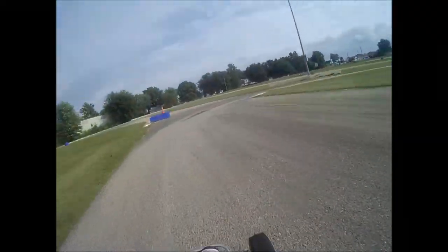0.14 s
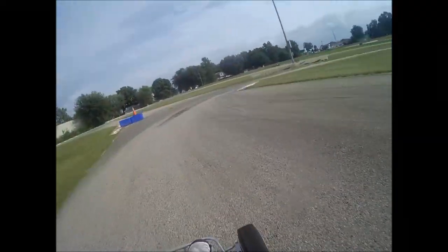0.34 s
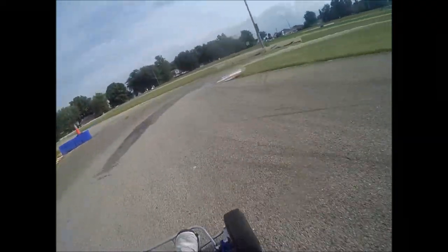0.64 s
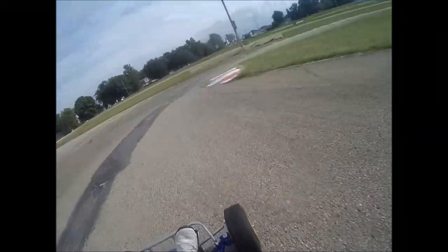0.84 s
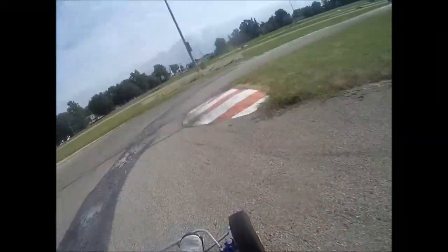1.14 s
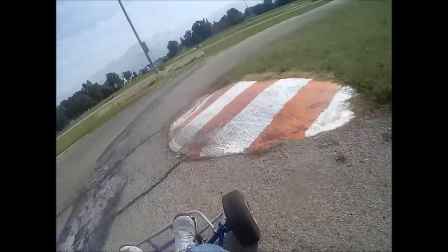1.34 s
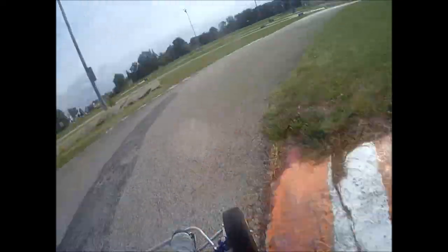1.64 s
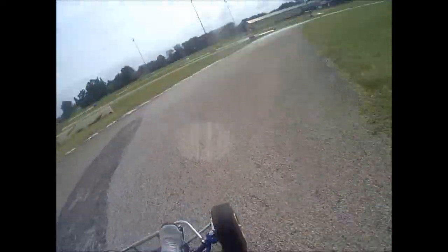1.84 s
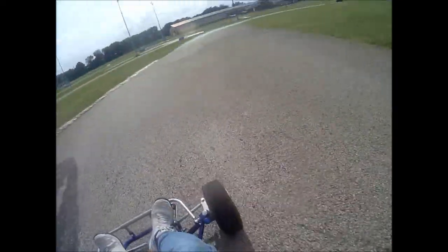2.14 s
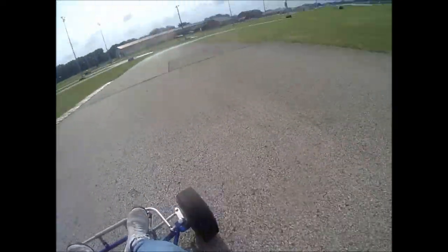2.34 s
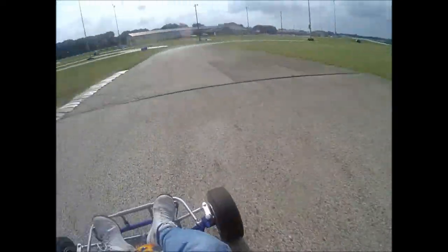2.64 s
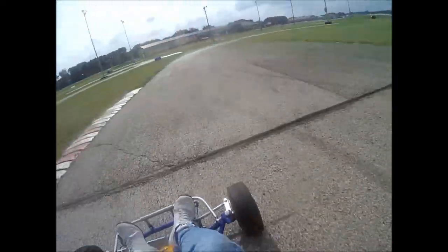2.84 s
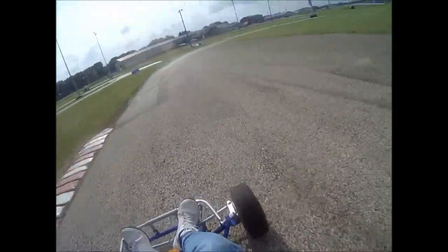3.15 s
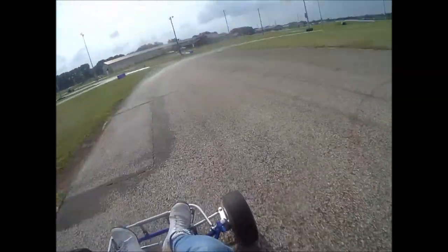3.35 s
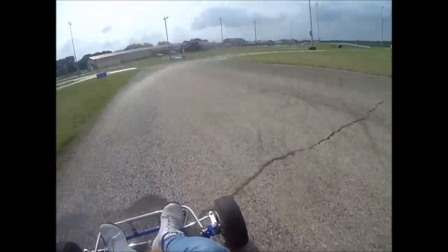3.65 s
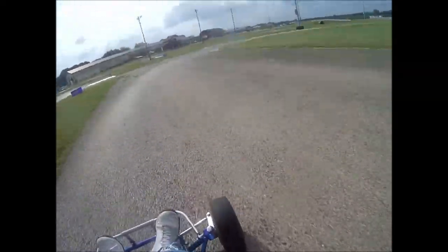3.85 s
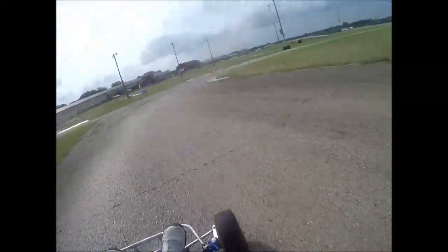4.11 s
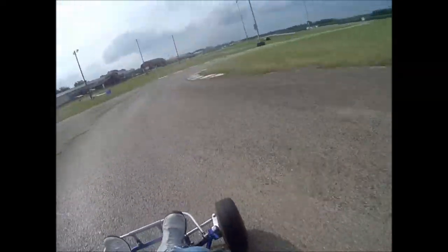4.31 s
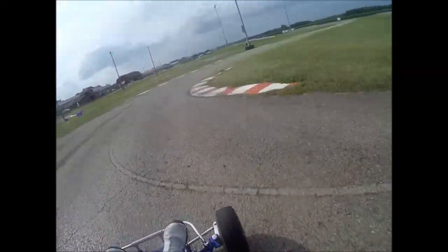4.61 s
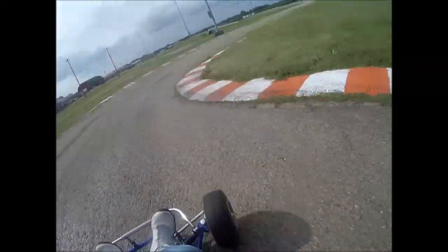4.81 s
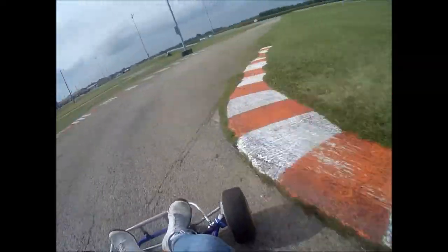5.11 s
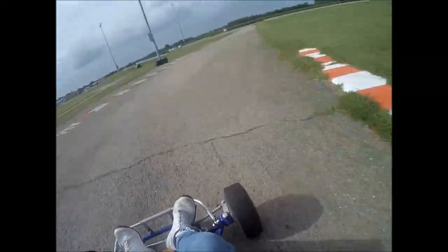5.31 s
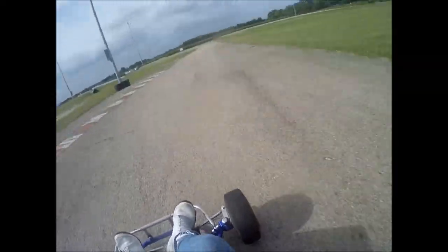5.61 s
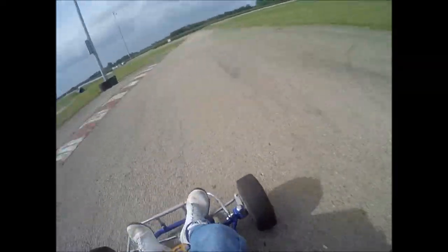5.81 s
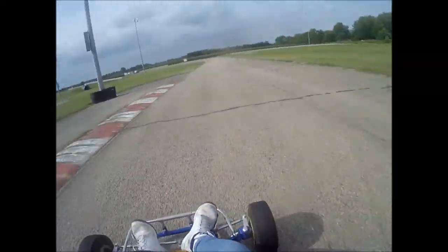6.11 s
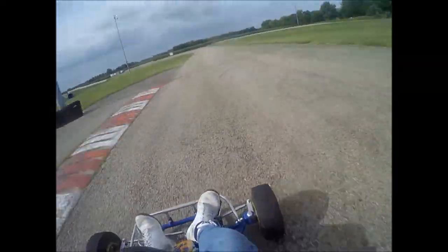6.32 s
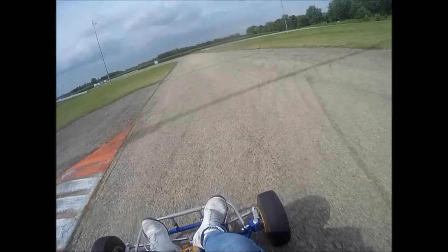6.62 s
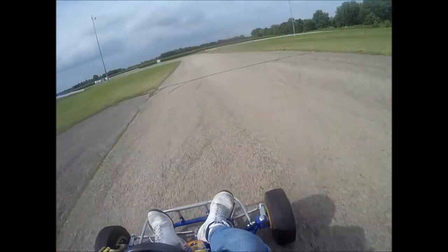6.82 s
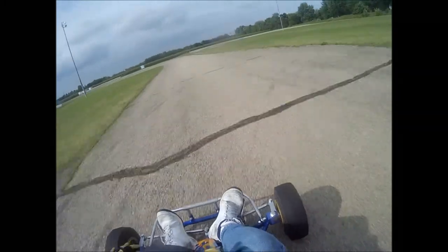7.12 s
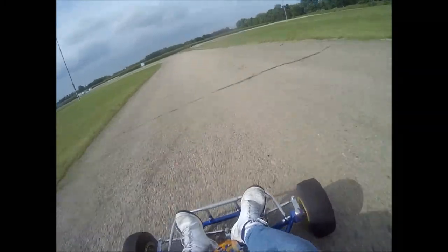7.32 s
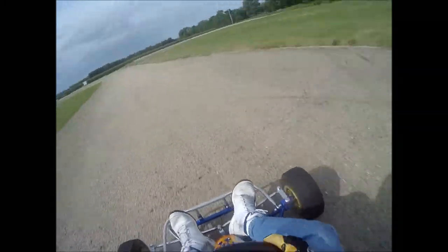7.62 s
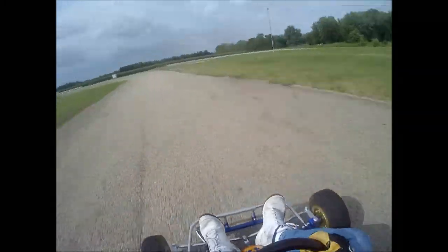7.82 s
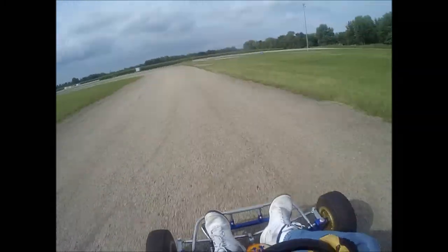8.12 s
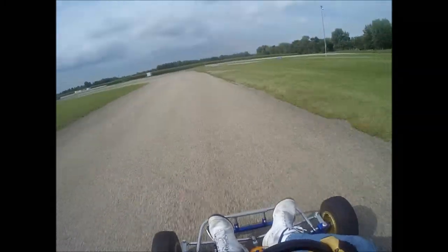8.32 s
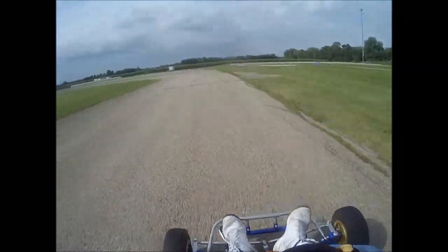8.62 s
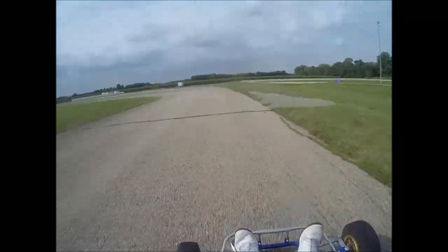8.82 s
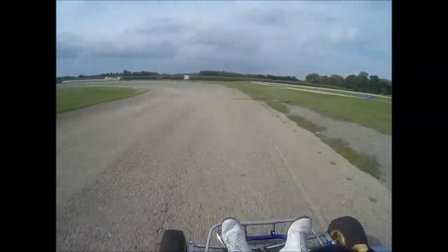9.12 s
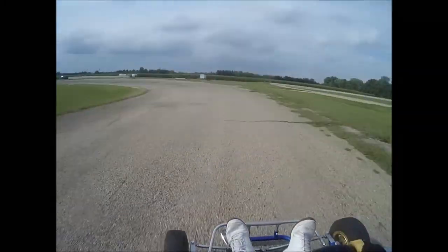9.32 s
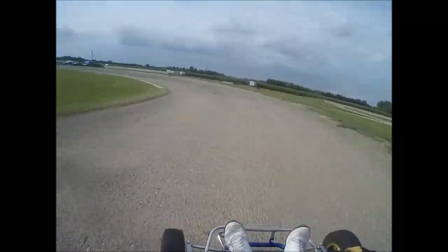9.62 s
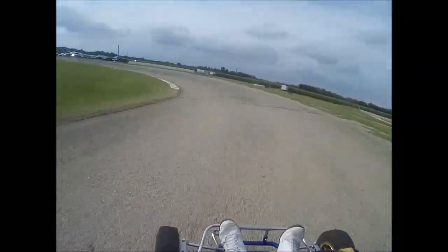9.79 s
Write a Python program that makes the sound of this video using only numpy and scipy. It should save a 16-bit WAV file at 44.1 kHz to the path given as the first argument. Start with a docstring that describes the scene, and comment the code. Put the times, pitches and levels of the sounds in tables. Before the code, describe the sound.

Heard dry and close from a racing kart's seat outdoors. From 0 to 1.4 s two small two-strokes coast, a quieter hollow burble sliding down in pitch over wind and tyre noise, with a few faint pops. At 1.4 s the throttle opens with sharp knocks and both flare into a loud, coarse buzz. Around 1.75 s a tiny stone click and a dull low thump mark the kerb. Until about 6.3 s the pitch holds nearly steady, the two engines beating unevenly, the second stuttering around 4 to 5.2 s. Then they lock together and climb steadily, becoming brighter, harder and raspier, peaking near 8.7 s. The throttle lifts: a cluster of crackling backfires at 8.8 to 8.9 s, level and pitch falling into a thin overrun with scattered pops. At 9.6 s a short, rough burst of throttle returns and fades slightly towards 10 s.

```python
"""On the track, at the driver's seat of a racing kart with two small two-stroke engines close by.
It coasts into a bend and takes the throttle: pulse trains, shaped by pipe resonances, beat on slipping clutches.
They lock to the axle, climb into the range of their tuned pipes, drop at the lift and briefly pull again.
Filtered noise makes wind, tyres and port rasp; sines add harmonics to the coasting, the lift and the last pull.
Knocks of single charges stand out; at the kerb low sines thump the frame and a short ring is a stone strike."""
import sys
import numpy as np
from scipy import signal
from scipy.fft import irfft
from scipy.io import wavfile
from scipy.ndimage import uniform_filter1d

SR = 44100
rng = np.random.default_rng(int(sys.argv[2]) if len(sys.argv) > 2 else 0)


def put_to_file(sound):
    """Save the sound as 16-bit audio at rate SR, in the file named by the first command-line argument."""
    columns = np.atleast_2d(sound).T  # one column per channel
    safe = np.clip(columns, -1, 1)
    whole_steps = np.round(safe * 32767)
    wavfile.write(sys.argv[1], SR, whole_steps.astype(np.int16))


N = 438794
T = np.arange(N) / SR
HZ = np.fft.rfftfreq(4096, 1 / SR)

# Wind and tyres, colour: pitch_hz, level_db
ROAD_COLOUR = [(20, -7.5), (60, -12.5), (110, -8.5), (280, -13.5), (700, -10.5), (920, -9.5), (1300, -4),
               (1900, -1), (2450, -8.5), (2800, -9.5), (3100, -13.5), (3400, -10), (4000, -28.5),
               (4700, -17), (6500, -41), (9000, -42), (15000, -58.5)]
ROAD_DB, ROAD_DB_PER_OCTAVE = -37.5, 3.5  # level at BITE_HZ; growth with the speed of the kart
# The frame drops off the kerb: start_s, level_db, pitch_hz, length_s
THUMPS = [(1.751, -33, 70, .009), (1.773, -38, 50, .022), (1.95, -44, 35, .03)]
# A stone strikes the frame: start_s, level_db (peak, before the trim in kerb)
STONE_HITS = [(1.749, 1)]
# Its ring: pitch_hz, level_db (relative), t60_s
STONE_RING = [(2210, 4, 0.0042), (2753, 8, 0.0045), (4054, 0, 0.01), (5564, 0.5, 0.0048),
              (6200, -8, 0.0054), (8500, -24, 0.0052)]
# Lone firings and backfires: start_s, level_db (peak)
POPS = [(0.0855, -27), (0.2605, -24), (0.3545, -28.5), (0.5995, -17.5), (1.4, -17.5), (1.424, -14.5),
        (1.782, -11.5), (4.533, -20), (8.793, -16), (8.812, -11), (8.845, -11.5), (8.88, -14),
        (9.09, -19.5), (9.331, -22), (9.589, -16), (9.623, -19), (9.837, -14)]
# Their colour: pitch_hz, level_db
POP_COLOUR = [(40, -49), (150, -21), (300, -15.5), (500, 0), (680, 1.5), (930, -17), (1280, 0), (1480, 2.5),
              (1620, 2), (1950, 6.5), (2350, -8), (2800, -6), (4000, -38.5), (8000, -55)]

# Load on the engines: time_s, load (0 throttle shut - 1 flat out)
LOAD = [(1.385, 0.01), (1.41, 0.61), (1.455, 0.86), (1.72, 0.88), (2.3, 0.9), (2.52, 0.96), (2.75, 0.86),
        (3.85, 0.87), (4.55, 0.73), (5.1, 0.86), (5.22, 0.86), (6.3, 0.87), (7.05, 0.82), (7.48, 0.83),
        (7.75, 0.89), (8.45, 0.85), (8.705, 0.86), (8.74, 0.75), (8.82, 0.46), (8.93, 0.33), (8.97, 0.24),
        (9.1, 0.08), (9.54, 0.14), (9.61, 0.79), (9.78, 0.63), (9.87, 0.48), (9.95, 0.5)]
# Firing rate of the first engine once the clutch bites, up the climb and after the lift: time_s, rate_hz
FIRST_SPEED = [(1.55, 117), (1.69, 118.2), (1.92, 118), (2.07, 120.7), (2.3, 120.5), (2.6, 118.7),
               (2.8, 120.5), (3.75, 120.2), (4.68, 116.8), (5.12, 116.7), (5.24, 119.6), (5.9, 119),
               (6.25, 119), (6.45, 123.5), (6.98, 132.8), (7.46, 139.2), (7.85, 144.1), (8.16, 149.3),
               (8.7, 158), (8.82, 155.7), (8.92, 152), (9.2, 146.4), (9.45, 141.4), (9.78, 139.4),
               (9.94, 135.6)]
# Firing rate of the second engine while its clutch slips: time_s, rate_hz
SECOND_SLIP_SPEED = [(1.548, 102.9), (1.979, 104.2), (2.119, 107.7), (2.618, 107.7), (3.028, 109),
                     (3.86, 108.7), (4.02, 113.4), (4.579, 108.1), (4.75, 111.5), (5.169, 108.1),
                     (5.35, 111.6), (5.68, 113.9), (6.1, 116.1), (6.3, 120.3)]
# Pick-up and bumps load or unload the tyres, so speed swerves and exhaust surges:
# centre_s, half_length_s, first_swerve_hz, second_swerve_hz, surge_db
JOLTS = [(1.44, 0.029, 0, 0, 2.5), (1.822, 0.04696, 1.5, 4, -2.5), (2.506, .065, -2.5, 1, -1),
         (5.792, .028, 6.5, 6, 0), (7.639, 0.037, 2.5, 2.1, 2), (9.615, 0.054, 3, 3.2, -0.5)]
COAST_HZ, RUN_DOWN_OCTAVES_PER_S = (111.7, 114.4), .378  # firing rates at the start; both sink at one pace
OPEN_S, FLARE_S = 1.41, .135  # the throttle opens; the engines flare up until the clutches bite
LOCK_S, LOCK_LAG = 6.3, 0.175  # from then on the second fires this share of a turn after the first
BITE_HZ = 120  # firing rate to which the level laws refer
PIPE_FROM_HZ, PIPE_SPREAD_HZ = 127, 6.3  # the tuned pipes come in over this range of firing rates

# Unevenness of the burns, 0-1 (first engine, second engine)
UNEVEN_SLIPPING, UNEVEN_LOCKED, UNEVEN_COASTING = (.035, .18), (.012, .2), (.03, .08)
LIGHT_LOAD_UNEVEN = 0.24  # added as the load falls, once the throttle has opened
# The first engine coughs as the throttle moves: centre_s, half_length_s, added_unevenness (0-1)
COUGHS = [(1.474, .06, .25), (2.493, .03, .1), (4.056, 0.1, 0.09), (4.4, .25, 0), (9.595, 0.036, 0)]
# The second engine four-strokes: start_s, end_s, added_unevenness (0-1), strong_weak_alternation (0-1)
STUMBLES = [(1.356, 1.96, 0.15, 0.2), (3.99, 5.195, 0.02, 0.73), (5.301, 6.1, 0.05, 0.05),
            (7.039, 8.148, 0.02, 0.49), (9.545, 9.903, 0.3, 0.5)]
STUMBLE_FADE_S, STUMBLE_SKIP = 0.042, .15  # skip: chance that a firing breaks the strong-weak pattern

# Resonances crossed by the harmonics when coasting, after the lift and in the last brief pull:
# pitch_hz, width_hz, level_db, even_against_odd_db, start_s, end_s
HARMONIC_RESONANCES = [(550, 50, -43, -14, 0, 1.4), (675, 140, -41, -18, 0, 1.4),
                       (825, 50, -46, 0, .75, 1.4), (1050, 60, -52, 0, .8, 1.4),
                       (1280, 100, -44, 0, 0, 1.4), (1790, 230, -40.5, 0, 0, 1.2),
                       (2850, 120, -52, 0, 0, 1.4), (3400, 150, -55, 0, 0, .8),
                       (725, 60, -41, 0, 8.95, 9.55), (1060, 100, -41, 0, 8.85, 9.25),
                       (1235, 70, -30, 0, 8.77, 8.98), (2170, 100, -25, 0, 8.78, 8.94),
                       (2190, 90, -25, 0, 9.82, 10), (555, 60, -33, 0, 9.58, 10)]
RESONANCE_FADE_S = .06

# State of the exhaust, fractions blend neighbours: time_s,
# state (0 idling down, 1 clutch slipping, 2 pulling, 3 on the pipe, 4 peak revs, 5 overrun)
STATE = [(0, 0.25), (1.38, 0.28), (1.43, 0.91), (6.1, 1.05), (6.45, 2.11), (7.4, 2.21), (7.75, 2.95),
         (7.95, 2.86), (8.35, 3.95), (8.7, 4.32), (8.9, 5), (9.52, 5), (9.62, 4.14), (9.78, 4.5),
         (9.87, 4.6)]
# Colour of one firing of the first engine, a table for each state: pitch_hz, level_db
IDLING = [(100, -12), (280, -11), (450, -2.5), (660, -9.5), (800, 0), (930, -21.5), (1050, -7),
          (1400, -17.5), (1800, 3), (2100, -2.5), (2500, -19), (2850, -6.5), (3100, -22.5), (3400, -8.5),
          (4500, -23), (8000, -58)]  # the second engine shares this one
SLIPPING = [(120, 1.5), (240, -4), (360, -1), (520, 5.5), (830, 9.5), (960, 7), (1080, 7), (1440, -11),
            (1820, 8), (2200, 10.5), (2500, -8), (3200, -12), (4400, -27.5), (8000, -45.5)]
PULLING = [(130, -1), (260, -13.5), (400, 7), (530, 8), (920, 5.5), (1020, -6.5), (1250, -3), (1600, -14),
           (1800, -2.5), (2400, -13.5), (3000, -30), (3450, -16), (4300, -39.5), (8000, -59.5)]
ON_PIPE = [(150, -8.5), (300, -27.5), (440, -5.5), (590, 5.5), (740, 0), (870, -3.5), (1000, -12),
           (1300, -20.5), (1600, -11), (1750, -3.5), (2030, 9.5), (2250, -7), (2450, 3.5), (2680, -28),
           (2950, -5.5), (3200, -11.5), (3450, -23.5), (3900, -21), (4300, -33), (5400, -35.5),
           (8000, -51.5)]
PEAK_REVS = [(150, -4), (300, -26), (460, -0.5), (620, 10), (770, 5.5), (930, -6.5), (1080, 1.5),
             (1240, -3.5), (1400, -4), (1600, -14), (1850, 6), (2150, 9.5), (2330, -3), (2500, -2.5),
             (2700, -12.5), (3100, -8.5), (3550, -14.5), (3700, -29), (3870, -17.5), (4300, -31),
             (5400, -33.5), (8000, -63)]
OVERRUN = [(145, -1), (290, -8.5), (430, 11.5), (590, -2.5), (730, 10), (1000, 5.5), (1350, -6),
           (1650, -11.5), (2050, 9), (2500, -4.5), (3000, -22), (3900, -21), (4500, -29), (8000, -72.5)]
# Colour of the second engine, slipping and then locked to the axle: pitch_hz, level_db
SECOND_SLIPPING = [(110, -4), (220, -6.5), (400, -4), (550, 4.5), (870, -10.5), (1100, -8), (1320, 2),
                   (1520, 4), (1720, -28), (1900, -2.5), (2200, 1), (2500, -15), (3100, -23), (7000, -48)]
SECOND_LOCKED = [(130, -7.5), (260, -8), (400, 3.5), (620, 2), (900, -5.5), (1100, -1.5), (1300, -1),
                 (1600, -12.5), (1950, -3), (2400, -7.5), (2800, -17), (3400, -28), (4400, -37),
                 (8000, -53)]
# Resonances and dips of pipes and silencers: pitch_hz, width_hz, lift_db
PIPE = [(636, 18, 7), (933, 29, -8.5), (1306, 98, 11.5), (1602.5, 243, 13), (2140, 77, -1),
        (2710, 416, 16.5), (3416, 564, 9.5), (4745, 320, 14.5), (5560, 970, 14.5)]
HOT_PIPE = 1.016  # at peak revs hotter gas raises the pipe resonances by this factor
# Turbulent share of a firing: pitch_hz, level_db
TURBULENCE = [(100, -27.5), (500, 1), (950, 9.5), (1350, 5.5), (2000, 13.5), (3000, 9), (5000, 11)]
# Reflections of the bark off seat, bodywork and track: delay_s, level_db
ECHOES = [(.0043, -16.5), (0.0108, -15.5)]
SILENCER_REFLECTION = .45
PIPE_TRIP_S = 0.000367  # on the pipe only one short round trip blunts the crack
# Rings of the exhaust that sing out around one load: pitch_hz, width_hz, level_db, load (0-1)
LOAD_RINGS = [(1010, 82, 9.5, 0.97), (1880, 260, 2, 0.94), (2826, 280, -0.5, 0.92), (3360, 230, -17, 0.4)]
RING_LOAD_SPREAD = 0.057
# Gas hissing out of the ports: pitch_hz, level_db
RASP_COLOUR = [(1500, -21), (3000, 6.5), (4000, 9.5), (4700, -9.5), (5600, -9.5), (6800, 0), (8500, -12.5),
               (11000, -49.5), (14300, -6.5), (15200, -18)]
# This hiss swells or sinks: centre_s, half_length_s, level_db
RASP_SWELLS = [(2.298, 0.23, 1.5), (7.716, .15, 4), (8.5, 0.49, -0.5)]

# Loudness of drone, bark and rasp before the trims in engines: full_load_db (at BITE_HZ),
# lost_with_throttle_shut_db, per_octave_of_speed_db, gained_when_locked_db, gained_on_pipe_db
DRONE_LAW = (-28.5, 15.5, 7.5, 7.5, -1)
BARK_LAW = (-18.5, 22, 17, -3, 2.5)
RASP_LAW = (-37.5, 10.5, 11, 9, -9.5)
# Level of the second engine against the first: time_s, level_db
SECOND_LEVEL = [(1.35, -7), (1.5, -4.5), (2.4, -4.5), (4.1, -4.5), (5.1, -9.5), (5.3, -1), (6.2, -3),
                (6.5, -20.5), (7.05, -6), (7.9, -12.5), (8.6, -17.5), (9.1, -20.5), (9.5, -16.5)]
DRONE_HANG_S = 0.05  # the drone outlasts the bark when the throttle is lifted
BARK_SURGE = 0.94  # share of a surge that reaches the bark
SPUTTER_DB, SPUTTER_S = 1.5, 0.015  # random flutter of the bark, deepest with the throttle shut
EDGE_HZ = 15300  # upper limit of the microphone signal


def amp(db):
    """Amplitude factor of a level in dB."""
    return 10 ** (np.asarray(db) / 20)


def evened(x):
    """Scales to rms 1."""
    return x / np.sqrt(np.mean(x ** 2) + 1e-20)


def ramp(x):
    """Holds x between 0 and 1."""
    return np.clip(x, 0, 1)


def swell(s, half_s):
    """A smooth bump of height 1 around time s."""
    return np.exp(-((T - s) / half_s) ** 2)


def curves(rows, t=T):
    """The columns of a table at times t."""
    s, *columns = np.transpose(rows)
    return [np.interp(t, s, column) for column in columns]


def spectrum(points):
    """Gain over frequency from pitch_hz, level_db points."""
    hz, db = np.transpose(points)
    return amp(np.interp(np.log(HZ + 1), np.log(hz), db))


def causal(gain):
    """The minimum-phase response with this gain: it rings only after the blow."""
    both_sides = np.r_[gain, gain[-2:0:-1]]
    log_gain = np.log(np.maximum(both_sides, 1e-5))
    return np.exp(np.conj(signal.hilbert(log_gain)))[:len(gain)]


def delayed(s):
    """Response of a pure delay."""
    return np.exp(-2j * np.pi * HZ * s)


def filtered(x, response):
    """Passes a sound through a frequency response."""
    return signal.oaconvolve(x, irfft(response))[:N]


def add(mix, s, sound):
    """Lays a sound into the mix at time s."""
    part = mix[round(s * SR):][:len(sound)]
    part += sound[:len(part)]


def speeds():
    """Firing rates of both engines: running down, flaring up to the slipping clutches, then locked."""
    flare, rates = ramp((T - OPEN_S) / FLARE_S), []
    for k, driven in enumerate((FIRST_SPEED, SECOND_SLIP_SPEED)):
        coast_hz = COAST_HZ[k] * 2 ** (-RUN_DOWN_OCTAVES_PER_S * T)
        swerve_hz = sum(hz[k] * swell(s, half_s) for s, half_s, *hz, _ in JOLTS)
        rates.append(coast_hz + flare * (curves(driven)[0] - coast_hz) + swerve_hz)
    first_hz, second_hz = rates
    return first_hz, np.where(T < LOCK_S, second_hz, first_hz)


def road(flutter_db=1.5):
    """Wind and tyre noise follows the axle, which catches up during the slip; it flutters as the kart shakes."""
    gripping = (T < OPEN_S) | (T > LOCK_S)
    axle_hz = np.interp(T, T[gripping], speeds()[0][gripping])
    flutter = evened(uniform_filter1d(rng.standard_normal(N), size=1200))
    level_db = ROAD_DB + ROAD_DB_PER_OCTAVE * np.log2(axle_hz / BITE_HZ) + flutter_db * flutter
    hiss = evened(filtered(rng.standard_normal(N), causal(spectrum(ROAD_COLOUR))))
    return amp(level_db) * hiss


def kerb(stone_db=-1, contact_s=0.00013):
    """The frame thumps off the kerb as low sines; a flung stone cracks against it and its modes die away."""
    out, t = np.zeros(N), T[:SR // 2]
    ring = sum(amp(db - 60 * t / t60) * np.sin(2 * np.pi * hz * t) for hz, db, t60 in STONE_RING)
    ring *= 1 - np.exp(-t / contact_s)
    for s, db in STONE_HITS:
        add(out, s, amp(db + stone_db) * ring / abs(ring).max())
    for s, db, hz, length in THUMPS:
        add(out, s, amp(db) * np.sin(2 * np.pi * hz * t) * np.exp(-(t / length) ** 2))
    return out


def bounces(trips_s=(.0005, .0011)):
    """Round trips in the silencer chambers draw each pulse out without colouring it (all-pass)."""
    delays = np.exp(-2j * np.pi * np.outer(trips_s, HZ))
    return np.prod((delays - SILENCER_REFLECTION) / (1 - SILENCER_REFLECTION * delays), axis=0)


def pops():
    """Single charges go off in the pipe with a hollow knock."""
    out, pop = np.zeros(N), irfft(causal(spectrum(POP_COLOUR)) * bounces())
    for s, db in POPS:
        add(out, s, amp(db) * pop / abs(pop).max())
    return out


def resonant_harmonics(second_db=-4, top_order=34):
    """Clean harmonics follow each engine's speed and swell as they cross a resonance."""
    near = np.array([ramp(np.minimum(T - start, end - T) / RESONANCE_FADE_S + .5)
                     for *_, start, end in HARMONIC_RESONANCES])
    out, on = np.zeros(N), near.any(axis=0)
    near = near[:, on]
    engine_gains = 1, amp(second_db) * (T[on] < LOCK_S)
    for hz, engine_gain in zip(speeds(), engine_gains):
        turns, hz = np.cumsum(hz)[on] / SR, hz[on]
        for k in range(4, top_order):
            gain = 0
            for share, (centre, width, db, even_db, *_) in zip(near, HARMONIC_RESONANCES):
                peak = amp(db + even_db * (k % 2 == 0))
                gain = gain + share * peak / (1 + (2 * (k * hz - centre) / width) ** 2)
            out[on] += engine_gain * gain * np.sin(2 * np.pi * (k * turns + rng.random()))
    return out


def locked(grip_s=0.93):
    """0 while the clutches slip, 1 once they grip fully."""
    return ramp((T - LOCK_S) / grip_s)


def shut():
    """1 with the throttle shut, 0 flat out."""
    return ramp(1 - curves(LOAD)[0])


def loudness(law, hz, hang_s=0):
    """Level in dB grows with load and speed, shifts with grip and pipes, and may hang on after a lift."""
    full_db, shut_db, octave_db, lock_db, pipe_db = law
    load = np.maximum(curves(LOAD)[0], curves(LOAD, T - hang_s)[0])
    on_pipe = ramp((hz - PIPE_FROM_HZ) / PIPE_SPREAD_HZ)
    steady_db = full_db - shut_db * (1 - load) + octave_db * np.log2(hz / BITE_HZ)
    return steady_db + load * (lock_db * locked() + pipe_db * on_pipe)


def combustion():
    """Unevenness of each engine's burns, and the strong-weak alternation of the second."""
    opened, grip = ramp((T - OPEN_S) / FLARE_S), locked()
    light_load = opened * LIGHT_LOAD_UNEVEN * shut()
    first, second = ((1 - opened) * coast + (opened - grip) * slip + grip * lock + light_load
                     for coast, slip, lock in zip(UNEVEN_COASTING, UNEVEN_SLIPPING, UNEVEN_LOCKED))
    first = first + sum(uneven * swell(s, half_s) for s, half_s, uneven in COUGHS)
    alternation = np.zeros(N)
    for start, end, uneven, depth in STUMBLES:
        stumble = ramp(np.minimum(T - start, end - T) / STUMBLE_FADE_S + .5)
        second = second + uneven * stumble
        alternation = alternation + depth * stumble
    return ramp(first), ramp(second), alternation


def firings(turns, uneven, alternation, size_spread=0.25, carry_over=0.13, jitter_s=.0001, puff_turns=0.88):
    """One pressure pulse a turn, a puff of turbulence behind it; poor burns vary in size and timing."""
    count = np.arange(np.ceil(turns[0]), turns[-1])
    s = np.interp(count, turns, T)
    chance = rng.standard_normal((len(s), 2))
    rough = ramp(np.interp(s, T, uneven))
    burn = chance[:, 0] - carry_over * np.roll(chance[:, 0], 1)  # a weak burn leaves fuel for the next
    strong_weak = (-1) ** np.cumsum(rng.random(len(s)) > STUMBLE_SKIP)
    size = np.maximum(1 + size_spread * rough * burn + np.interp(s, T, alternation) * strong_weak, 0)
    size /= np.sqrt(1 + (size_spread * rough) ** 2)
    # windowed sinc pulses land between the samples
    place = (s + jitter_s * rough * chance[:, 1]) * SR
    taps = np.floor(place)[:, None] + np.arange(-7, 9)
    offset = taps - place[:, None]
    shape = np.sinc(offset) * np.sinc(offset / 8)
    height = size * np.sqrt(np.gradient(s) * SR)
    samples = np.clip(taps, 0, N - 1).astype(int)
    pulses = np.bincount(samples.ravel(), (shape * height[:, None]).ravel(), N)
    latest = np.maximum(np.searchsorted(s, T) - 1, 0)
    gate = evened(np.exp(-(turns % 1) / puff_turns)) * size[latest]
    puffs = uneven * gate * rng.standard_normal(N)
    return pulses, puffs, gate


def piped(points, heat=1):
    """Gain of a colour shaped by the pipe resonances; an open pipe radiates no deep bass."""
    lift_db = sum(db / (1 + (2 * (HZ - heat * hz) / width) ** 2) for hz, width, db in PIPE)
    radiation = np.minimum(HZ / 90, 1) ** 2
    return spectrum(points) * amp(lift_db) * radiation


def exhaust(pulses, puffs, levels, colours, split_hz=1100, return_s=0.001887, return_db=-16):
    """Firings through the pipe, coloured by the state; low drone and high bark swell separately."""
    drone_db, bark_db = levels
    state, = curves(STATE)
    drive = pulses + filtered(puffs, causal(spectrum(TURBULENCE)))
    low = 1 / (1 + (HZ / split_hz) ** 12)
    # short waves bounce off the kart, so single harmonics flare and fade as the speed moves
    high = (1 - low) * (1 + sum(amp(db) * delayed(s) for s, db in ECHOES))
    cone_return = 1 + amp(return_db) * (1 - low) * delayed(return_s)
    out = np.zeros(N)
    for k, colour in enumerate(colours):
        heat = HOT_PIPE if colour is PEAK_REVS else 1
        response = causal(piped(colour, heat)) * delayed(.002)
        if colour is ON_PIPE or colour is PEAK_REVS:
            # the front steepens to a sharp crack and the cone of the tuned pipe sends a wave back
            response = response * bounces([PIPE_TRIP_S]) * cone_return
        else:
            response = response * bounces()
        share = np.maximum(1 - abs(state - k), 0)
        for band, db in ((low, drone_db), (high, bark_db)):
            voice = response * band
            voice = voice / np.sqrt(np.mean(abs(voice) ** 2))
            out += filtered(drive * share * amp(db), voice)
    return out


def singing(sound):
    """Narrow resonances ring out of the exhaust sound, each around its own load."""
    load, out = curves(LOAD)[0], sound
    for hz, width, db, best_load in LOAD_RINGS:
        ring = signal.lfilter(*signal.iirpeak(hz, hz / width, fs=SR), sound)
        out = out + amp(db) * np.exp(-((load - best_load) / RING_LOAD_SPREAD) ** 2) * ring
    return out


def port_rasp(first_gate, second_gate, steady_rasp=0.58):
    """Gas hisses out of the ports as noise that pulses with the firings over a steady share."""
    gate = np.sqrt(steady_rasp ** 2 + first_gate ** 2 + second_gate ** 2)
    gate = np.roll(gate, round(.002 * SR))  # keeps step with the delay of the exhaust
    rasp = evened(filtered(gate * rng.standard_normal(N), causal(piped(RASP_COLOUR))))
    return rasp * amp(sum(db * swell(s, half_s) for s, half_s, db in RASP_SWELLS))


def engines(engine_db=-1.0, rasp_db=-2):
    """Two engines on one axle: they run apart and beat while the clutches slip, then fire in step."""
    first_hz, second_hz = speeds()
    first_uneven, second_uneven, alternation = combustion()
    sputter = shut() * evened(uniform_filter1d(rng.standard_normal(N), size=round(SPUTTER_S * SR)))
    surge_db = sum(db * swell(s, half_s) for s, half_s, _, _, db in JOLTS)
    drone_db = loudness(DRONE_LAW, first_hz, DRONE_HANG_S) + surge_db
    bark_db = loudness(BARK_LAW, first_hz) + BARK_SURGE * surge_db + SPUTTER_DB * sputter
    levels = drone_db, bark_db

    first_turns = np.cumsum(first_hz) / SR
    slip = np.cumsum(first_hz - second_hz) / SR
    second_turns = first_turns - slip + slip[-1] - LOCK_LAG
    pulses, puffs, first_gate = firings(first_turns, first_uneven, np.zeros(N))
    first = exhaust(pulses, puffs, levels, [IDLING, SLIPPING, PULLING, ON_PIPE, PEAK_REVS, OVERRUN])
    pulses, puffs, second_gate = firings(second_turns, second_uneven, alternation)
    second = exhaust(pulses, puffs, levels, [IDLING, SECOND_SLIPPING] + 4 * [SECOND_LOCKED])

    balance = amp(curves(SECOND_LEVEL)[0])
    both = singing(first + balance * second) / np.hypot(1, balance)
    rasp = port_rasp(first_gate, balance * second_gate)
    return amp(engine_db) * both + amp(loudness(RASP_LAW, first_hz) + rasp_db) * rasp


def scene():
    """All sources as heard at the driver's seat, in one channel."""
    return (road() + kerb() + pops() + resonant_harmonics() + engines())[None]


def record(dry):
    """The microphone signal: a linear-phase low-pass ends the treble at EDGE_HZ."""
    lowpass = signal.firwin(511, EDGE_HZ, window=("kaiser", 9), fs=SR)
    return signal.oaconvolve(dry, lowpass[None], "same")


dry = scene()
out = record(dry)
put_to_file(out)
```